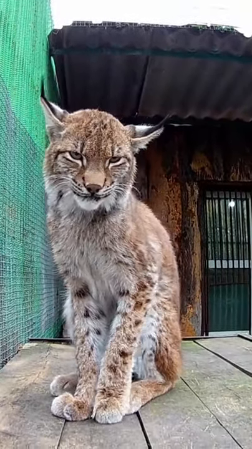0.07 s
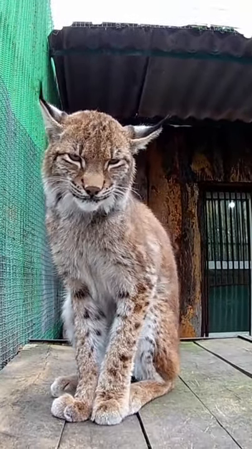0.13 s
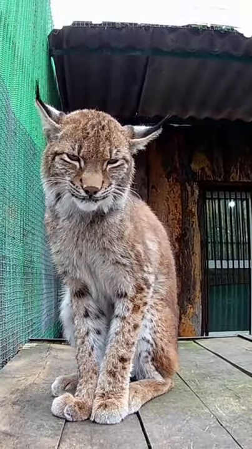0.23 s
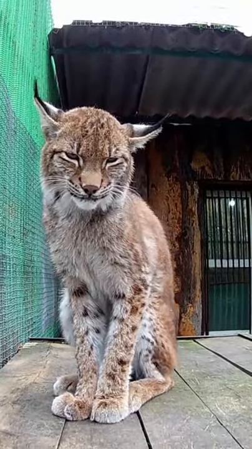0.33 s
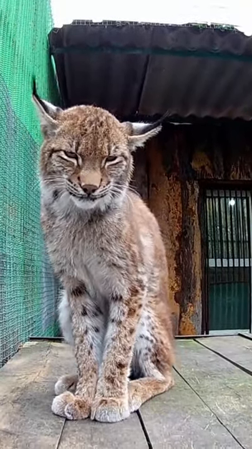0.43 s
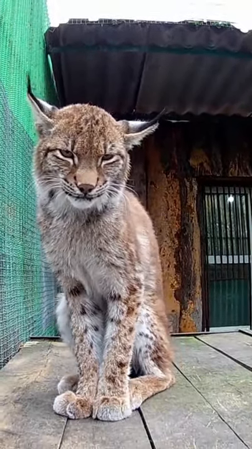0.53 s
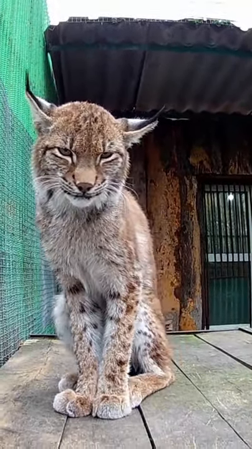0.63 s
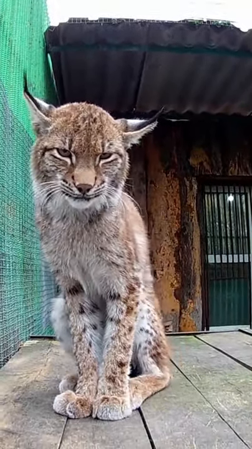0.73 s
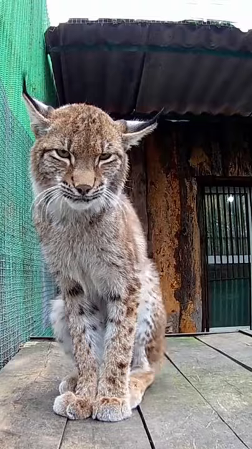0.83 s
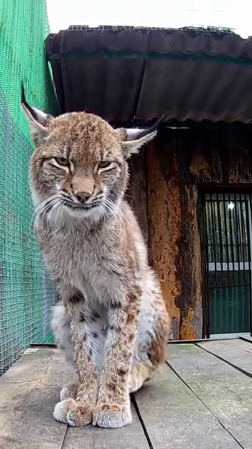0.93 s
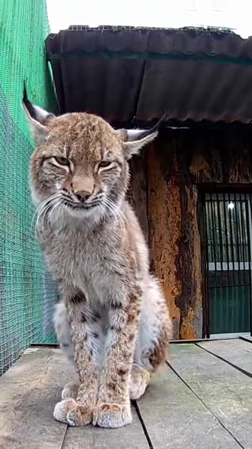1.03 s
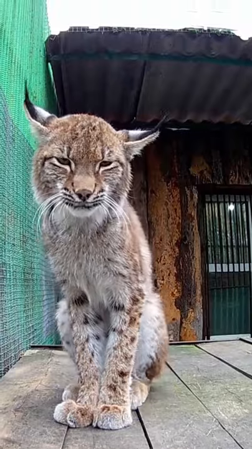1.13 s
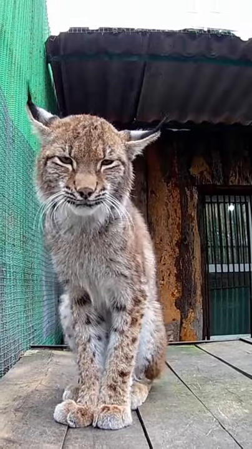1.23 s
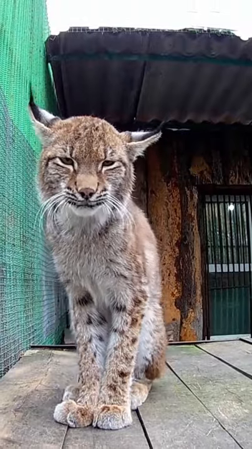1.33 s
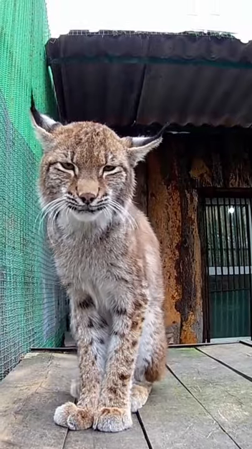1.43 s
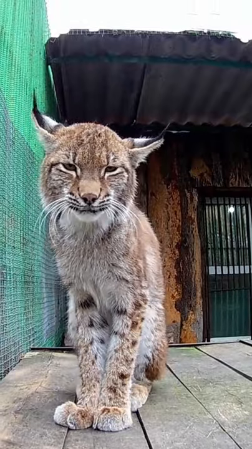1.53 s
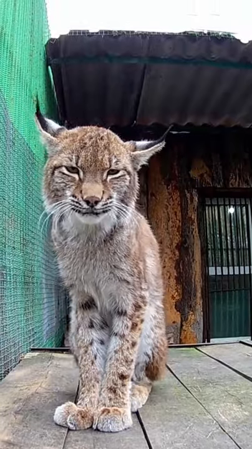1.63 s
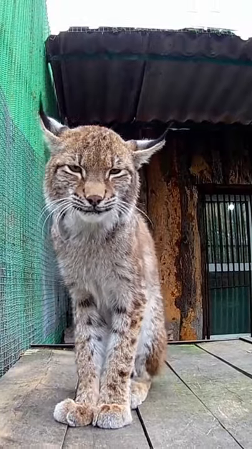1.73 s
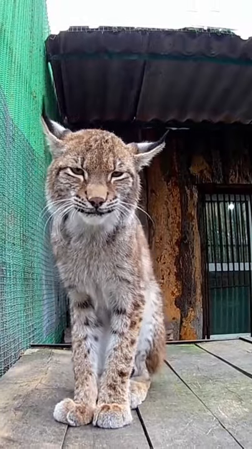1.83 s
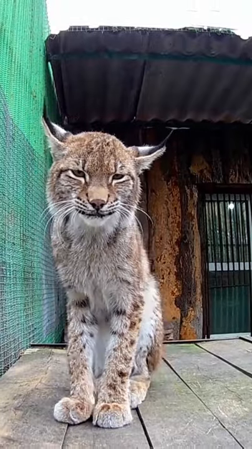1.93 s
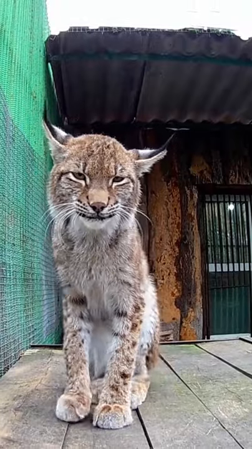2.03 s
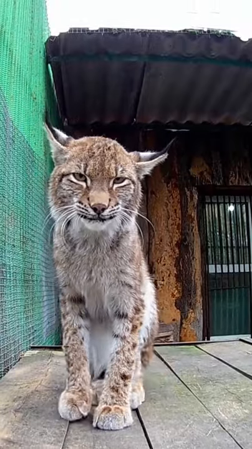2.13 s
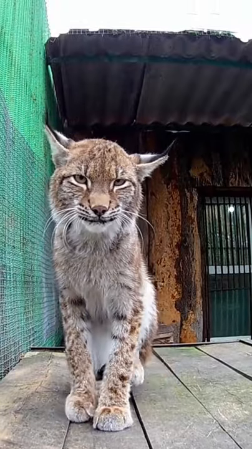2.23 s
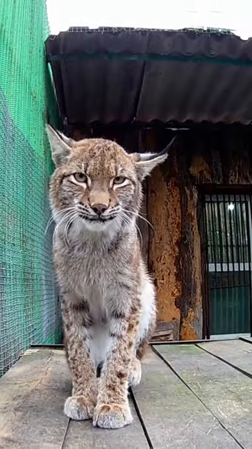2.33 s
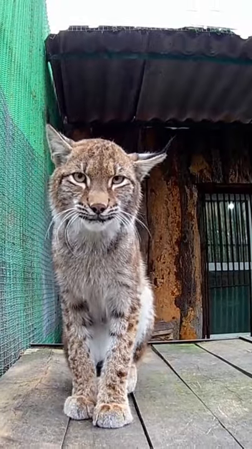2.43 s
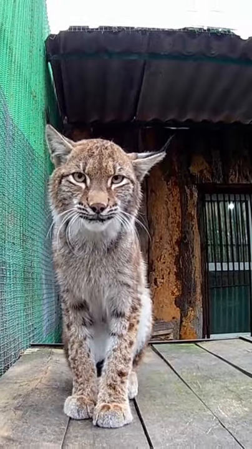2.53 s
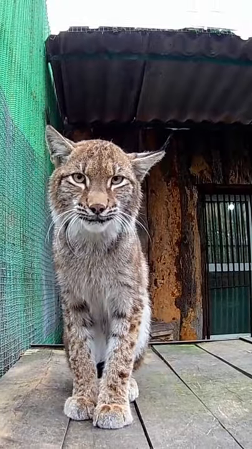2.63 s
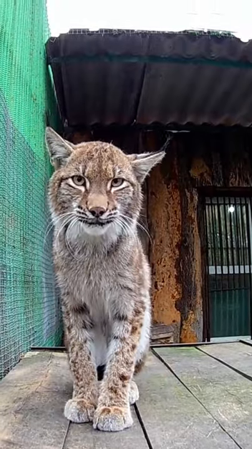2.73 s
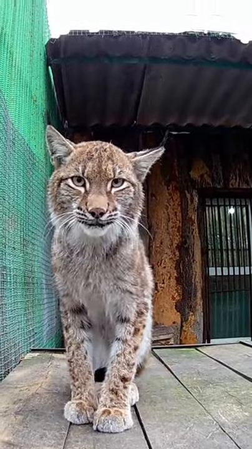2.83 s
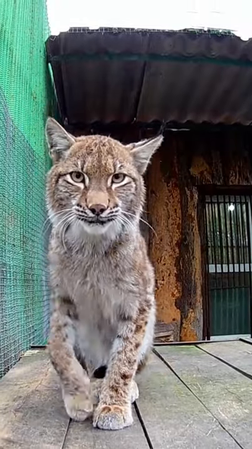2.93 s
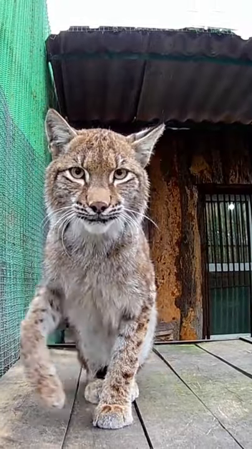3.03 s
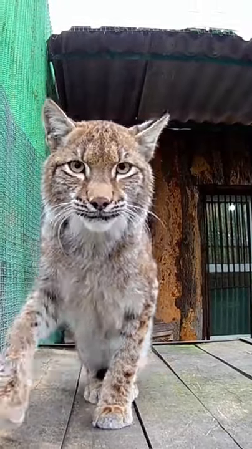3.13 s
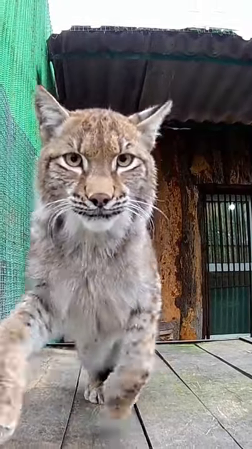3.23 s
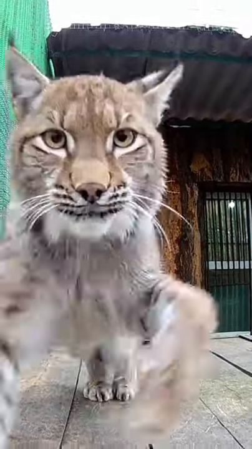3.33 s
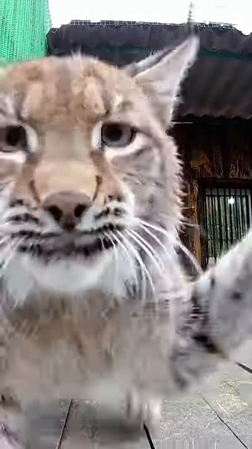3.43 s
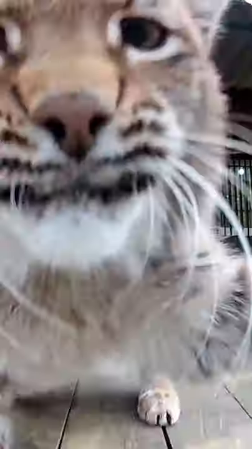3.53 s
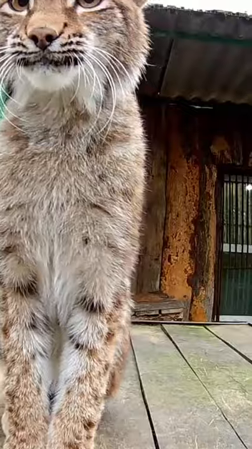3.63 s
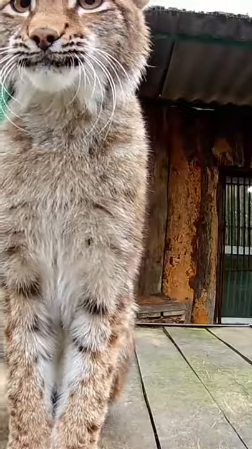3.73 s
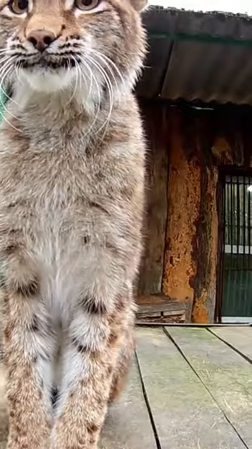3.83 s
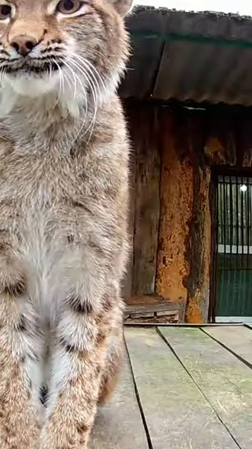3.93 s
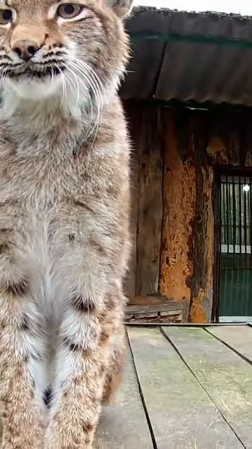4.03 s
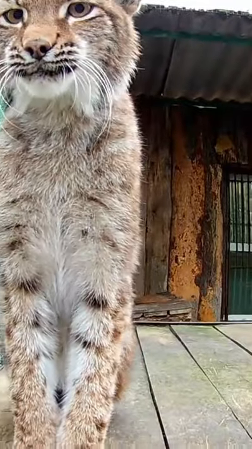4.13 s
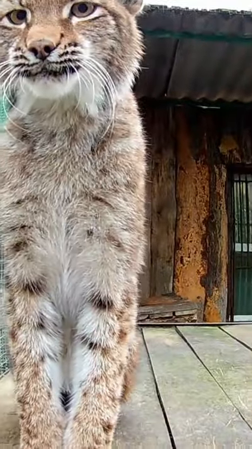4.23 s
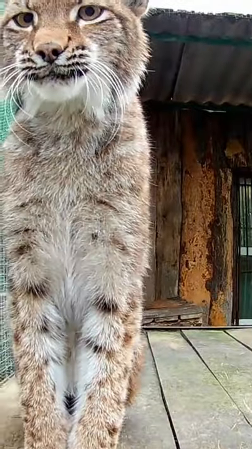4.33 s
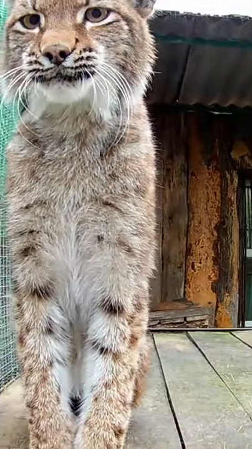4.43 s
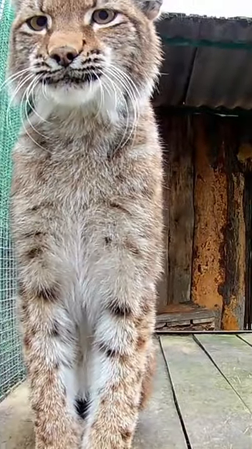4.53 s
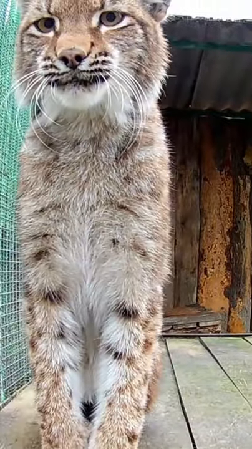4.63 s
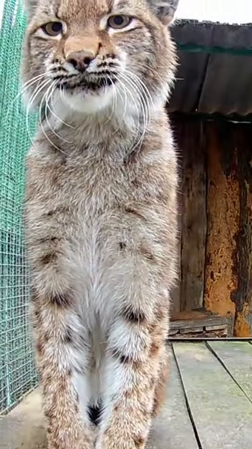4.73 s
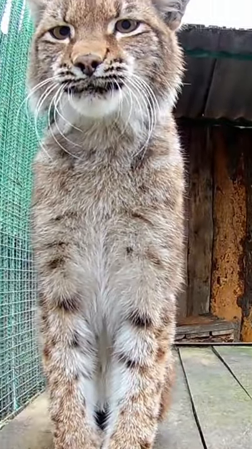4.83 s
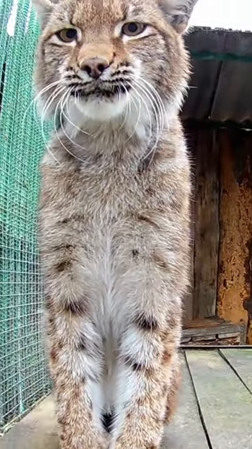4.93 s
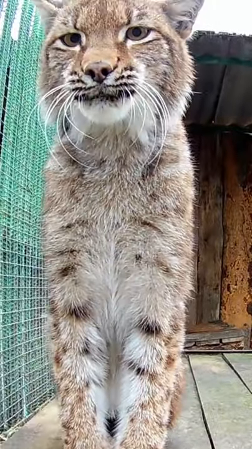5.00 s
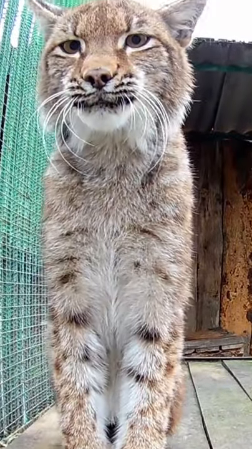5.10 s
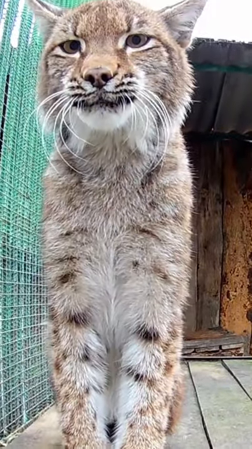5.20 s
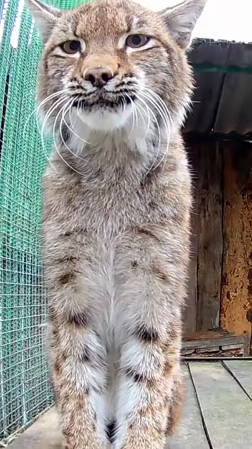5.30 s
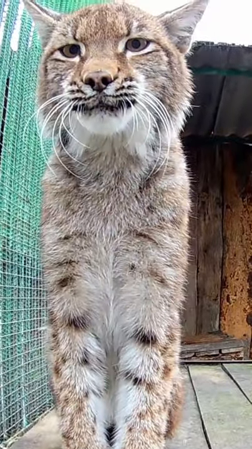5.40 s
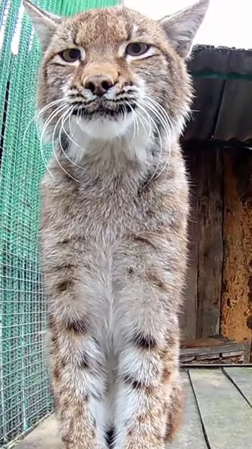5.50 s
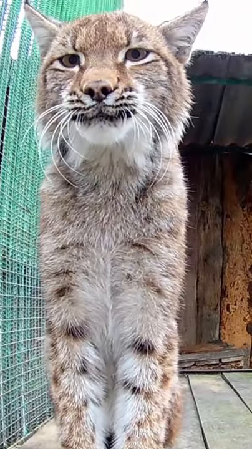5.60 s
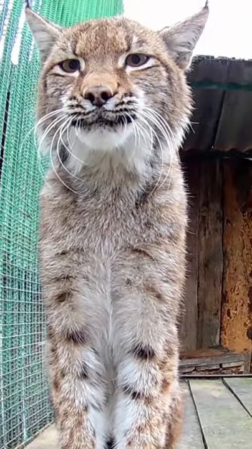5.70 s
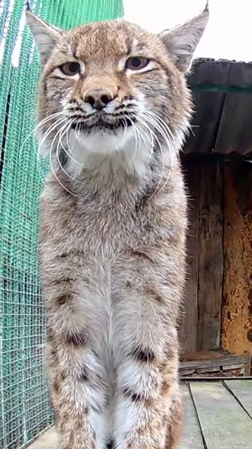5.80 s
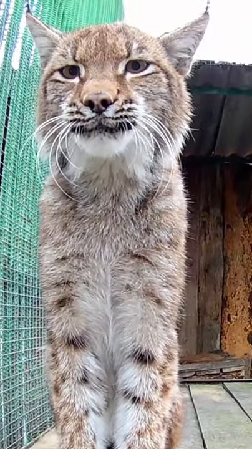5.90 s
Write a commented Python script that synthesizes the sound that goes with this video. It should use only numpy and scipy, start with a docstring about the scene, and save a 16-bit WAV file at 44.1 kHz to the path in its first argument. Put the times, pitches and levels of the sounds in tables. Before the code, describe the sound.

A close handheld-style microphone catches faint hiss and wind rumble, with isolated small claw clicks on planks. A lynx lunges: soft scuffs, then one very loud, slightly flattened knock right on the device. Several duller, turned-down knocks and scrapes follow around four seconds with a faint hum, then far birds call clearly and a few dry taps end it. Almost no echo.

```python
"""Light wind and microphone hiss are heard first, then a lynx's claws tap and scuff a wooden deck in an open pen.
Taps and knocks are short forces exciting resonances; scuffs are showers of slips; wind and hiss are shaped noise.
Far birds whistle in sliding harmonic tones, and a distant flock murmurs as noise in a few bands.
The lynx pounces up to the camera and knocks it; a faint hum near 620 Hz comes and goes.
During the later knocks, from about 4 s to 4.4 s, the whole level is turned down."""
import sys
import numpy as np
from scipy import signal
from scipy.io import wavfile
from scipy.ndimage import uniform_filter1d

SR = 44100
rng = np.random.default_rng(int(sys.argv[2]) if len(sys.argv) > 2 else 0)


def master_out(mix):
    """Clip the mix to full scale and print it as 16-bit PCM to the path in sys.argv[1]."""
    frames = np.transpose(np.atleast_2d(mix))
    ceiling = np.clip(frames, -1, 1)
    pcm = np.round(ceiling * 32767).astype(np.int16)
    wavfile.write(sys.argv[1], SR, pcm)


N = 262836


def gain_of(db):
    """Logarithmic level: 20 dB is a factor of ten in amplitude."""
    return 10 ** (np.asarray(db) / 20)


def evened(x):
    """Power normalisation: scales to rms 1."""
    return x / np.sqrt(np.mean(x ** 2) + 1e-20)


def peaked(x):
    """Amplitude normalisation: scales to peak 1."""
    return x / (abs(x).max() + 1e-20)


def add(mix, start_s, sound):
    """Superposition: sums a sound into the mix in place, from start_s on."""
    part = mix[round(start_s * SR):][:len(sound)]
    part += sound[:len(part)]


def band(x, lo_hz, hi_hz):
    """Causal band-pass filtering with steep skirts."""
    return signal.sosfilt(signal.butter(4, [lo_hz, hi_hz], "band", fs=SR, output="sos"), x)


def resonate(x, hz, width_hz):
    """Resonance by heterodyning: shift the moving pitch hz to zero, smooth, and shift back."""
    turn = np.exp(2j * np.pi * np.cumsum(hz * np.ones(len(x))) / SR)
    r = np.exp(-np.pi * width_hz / SR)
    smoothed = signal.lfilter([1 - r], [1, -r], x / turn)
    return 2 * (turn * smoothed).real


def ring(modes):
    """Modal superposition: an impulse response is a sum of exponentially decaying sines."""
    t = np.arange(SR // 5) / SR
    return sum(gain_of(db - 60 * t / t60) * np.sin(2 * np.pi * hz * t) for hz, db, t60 in modes)


def coloured(spectrum, patchy_db, top_hz):
    """Spectral shaping of random noise, its level drifting in patches of time and frequency; rms 1."""
    hz = np.fft.rfftfreq(1024, 1 / SR)
    f, db = np.transpose(spectrum)
    a, b, patches = rng.standard_normal((N // 256 + 5, 513, 3)).T
    patches = evened(uniform_filter1d(uniform_filter1d(patches, 10, 0), 12, 1))
    shape = gain_of(np.interp(np.log(hz + 1), np.log(f), db)) * (hz < top_hz)
    z = (a + 1j * b) * shape[:, None] * gain_of(patchy_db * patches)
    return evened(signal.istft(z, nperseg=1024, noverlap=768)[1][:N])


def echoes(x, t60, first_s, lo_hz, hi_hz):
    """Reverberation as sparse reflections of random sign under an exponential decay."""
    at = np.arange(round(first_s * SR), round(t60 * SR), 22)
    reflections = np.zeros(at[-1] + 22)
    signs = rng.choice([-1., 1.], len(at))
    reflections[at + rng.integers(0, 22, len(at))] = signs * gain_of(-60 * at / SR / t60)
    reflections = band(reflections, lo_hz, hi_hz)
    return signal.fftconvolve(x, reflections / np.linalg.norm(reflections))[:N]


# spectrum of the microphone hiss, relative: pitch_hz, level_db per Hz
HISS_SPECTRUM = [(100, -14), (190, -4.5), (350, -6), (800, -8), (1700, -22), (3200, -27.5), (6000, -32.5),
                 (10000, -35.5), (12500, -34), (15000, -32)]
HISS_DB, HISS_PATCHY_DB, HISS_TOP_HZ = -68, 1.1, 15150


def hiss():
    """Stationary broadband noise with a sharp upper limit and slight patchiness."""
    return gain_of(HISS_DB) * coloured(HISS_SPECTRUM, HISS_PATCHY_DB, HISS_TOP_HZ)


# spectrum of the wind, relative: pitch_hz, level_db per Hz
WIND_SPECTRUM = [(10, -5), (30, 2.5), (45, 1), (65, 1.5), (100, -3), (130, -13), (200, -13.5), (320, -40.5)]
# gusts over the breeze: centre_s, peak_db, half_width_s (to 1/e)
GUSTS = [(.23, -65, 0.081), (.48, -59, 0.046), (.6, -64.5, 0.084), (.73, -64.5, 0.069), (1.1, -63, 0.056),
         (1.27, -65, 0.046), (1.52, -69, 0.025), (2.01, -69, .04), (2.17, -72, 0.015), (2.87, -59, 0.037),
         (3.29, -55.5, 0.046), (3.42, -54, 0.084), (3.6, -54.5, 0.041), (4.68, -61, .05),
         (5.04, -60, 0.049), (5.3, -63, 0.11), (5.62, -64.5, 0.15), (5.95, -65, 0.032)]
# spectrum of the steady low wind rumble, relative: pitch_hz, level_db per Hz
RUMBLE_SPECTRUM = [(12, -2.5), (30, 0.5), (50, -4.5), (90, -30.5)]
BREEZE_DB, RUMBLE_DB = -67.5, -70.5


def wind():
    """Low-frequency noise on the microphone, modulated by bell-shaped gusts, over a steady low rumble."""
    t = np.arange(N) / SR
    level = gain_of(BREEZE_DB) + sum(gain_of(db) * np.exp(-((t - s) / half) ** 2) for s, db, half in GUSTS)
    rumble = gain_of(RUMBLE_DB) * coloured(RUMBLE_SPECTRUM, .6, 400)
    return level * coloured(WIND_SPECTRUM, 1.5, 400) + rumble


# bands of the blurred calls, the lowest first: pitch_hz, width_hz, level_db (relative)
FLOCK_BANDS = [(1283, 240, 1), (1830, 470, -7), (2200, 160, -15.5)]
# bouts of calls: start_s, length_s, level_db, upper_db (added to the upper bands)
BOUTS = [(0.61, 0.23, -76.5, -1), (0.889, 0.11, -72, 8), (2.56, 0.48, -81, 6.5), (3.242, 0.55, -77, -2.5),
         (4.443, 0.474, -76.5, 8.5), (5.067, 0.29, -70, 3), (5.48, 0.29, -72.5, -1.5)]
FLOCK_DB, FLOCK_UPPER_DB, BOUT_EDGE_S = -83, -5.5, .08  # murmur between bouts; time to swell and fade


def flock():
    """Many overlapping calls merge into grainy noise, resonant in their bands, that swells in bouts."""
    t = np.arange(N) / SR
    db, upper_db = FLOCK_DB, FLOCK_UPPER_DB
    for s, length, bout_db, bout_upper_db in BOUTS:
        share = np.clip(np.minimum(t - s, s + length - t) / BOUT_EDGE_S + .5, 0, 1)
        db = db + share * (bout_db - FLOCK_DB)
        upper_db = upper_db + share * (bout_upper_db - FLOCK_UPPER_DB)
    grain = evened(uniform_filter1d(rng.standard_normal(N), 500))
    noise = rng.standard_normal(N) * gain_of(2.5 * grain)
    low, *upper = (gain_of(level) * evened(resonate(noise, hz, width)) for hz, width, level in FLOCK_BANDS)
    return gain_of(db) * band(low + gain_of(upper_db) * sum(upper), 900., 2500.0)


# far bird notes: start_s, length_s, start_hz, end_hz, level_db
NOTES = [(0.625, 0.032, 2306, 1730, -72), (0.659, 0.092, 1248, 1314, -72.5),
         (0.778, 0.1, 1850.0, 1770, -79), (0.928, 0.036, 2190, 1770, -74), (0.936, 0.027, 1300, 1340, -75),
         (1.131, 0.026, 2076, 2010, -71.5), (1.152, 0.022, 2570, 2200, -76.5),
         (2.501, 0.058, 1740, 1755, -77), (2.586, 0.074, 1740, 1776, -71), (2.686, 0.048, 1805, 1710, -75),
         (2.727, 0.062, 2830.0, 2730, -78), (2.764, 0.07, 1970, 2060, -73.5),
         (2.958, 0.079, 1790.0, 1800, -71), (3.04, 0.069, 1770, 1690, -75),
         (4.446, 0.051, 1370, 1044, -59.5), (4.498, 0.052, 1347, 997, -63.5),
         (4.519, 0.053, 2207, 1704, -65.5), (4.573, 0.076, 1708, 1574, -68.5), (4.6, .25, 2618, 2387, -79),
         (5.043, 0.031, 1290, 1450, -66.5), (5.06, 0.049, 2172, 1683, -64.5),
         (5.11, 0.19, 2680.0, 2330, -76), (5.031, 0.44, 4410, 4070, -84.5), (5.202, 0.3, 3410, 3400, -86),
         (5.599, 0.19, 2390, 2250, -81), (5.469, 0.045, 2162, 1810.0, -65), (5.51, 0.04, 1750, 1720, -66)]
# a harsher squawk, rich in overtones: start_s, length_s, start_hz, end_hz, level_db
SQUAWKS = [(0.903, 0.04, 1412, 1214, -63.5)]
OVERTONE_DB, SQUAWK_OVERTONE_DB = -31, -6.5  # step from each harmonic to the next
HUSK_DB, HUSK_DB_PER_S = 1.06, 6.5  # long notes are hoarser


def bird_note(length, start_hz, end_hz, db, overtone_db):
    """A gliding harmonic series, made hoarse by random frequency and amplitude modulation."""
    t = np.arange(0, length, 1 / SR)
    waver, husk = (evened(uniform_filter1d(rng.standard_normal(SR // 2), 250))[:len(t)] for _ in "ab")
    glide = np.linspace(start_hz, end_hz, len(t)) * (1 + (0.0093 + 0.04 * length) * waver)
    phase = 2 * np.pi * np.cumsum(glide) / SR
    note = sum(gain_of(overtone_db * k) * np.sin((k + 1) * phase) for k in range(4))
    level = gain_of(db + (HUSK_DB + HUSK_DB_PER_S * length) * husk)
    return level * note * signal.windows.tukey(len(t), .4)


def birds():
    """Direct sound plus reverberation: far calls and the echoes of the open ground."""
    calls = np.zeros(N)
    for table, overtone_db in ((NOTES, OVERTONE_DB), (SQUAWKS, SQUAWK_OVERTONE_DB)):
        for s, *row in table:
            add(calls, s, bird_note(*row, overtone_db))
    return calls + gain_of(-10) * echoes(calls, t60=0.95, first_s=.018, lo_hz=500., hi_hz=4500.)


# the faint hum comes and goes: start_s, length_s, level_db, fade_db per s
HUM = [(0.556, 0.13, -59, -89), (4.003, 0.392, -55.5, -16), (4.394, 0.25, -67, -50)]
# tones of the hum, relative: pitch_hz, level_db
HUM_TONES = [(623, 0.5), (1330, -16), (2330, -24)]


def hum():
    """Additive synthesis: a few steady tones, with a slight beat as amplitude modulation."""
    t = np.arange(N) / SR
    level = np.zeros(N)
    for s, length, db, fade_db in HUM:
        level += (t > s) * (t < s + length) * gain_of(db + fade_db * np.clip(t - s, 0, length))
    beat = 1 + 0.23 * np.sin(2 * np.pi * 7.9 * t)
    tones = sum(gain_of(db) * np.sin(2 * np.pi * hz * t) for hz, db in HUM_TONES)
    return uniform_filter1d(level, size=400) * beat * tones


# faint dry ticks: start_s, peak_db, pitch_hz, length_s (to fall 30 dB)
TICKS = [(3.041, -63, 3180, 0.0097), (3.949, -56.5, 2010, 0.004), (4.347, -52.5, 2794, 0.0045),
         (4.361, -40.5, 2710, 0.0083), (4.62, -62.5, 3865, .006), (4.668, -62, 3980, 0.013),
         (4.778, -69, 3000, .006), (4.805, -61, 3700, .006), (4.897, -68, 4400, 0.0054)]


def tick(db, hz, length):
    """Transient noise: an exponentially decaying crackle in a wide high band."""
    crackle = rng.standard_normal(1500) * gain_of(-30 * np.arange(1500) / SR / length)
    return gain_of(db) * peaked(band(crackle, 0.44 * hz, 1.18 * hz))


# scuffs of pad and fur: start_s, rise_s, hold_s, fall_s, level_db, fall_db, start_hz, end_hz (resonance),
# middle_db (1.1-2.4 kHz), rasp_db (2.1-6 kHz), the last two relative to level_db
SCUFFS = [(.526, 0.017, 0.0056, 0.005, -29.5, -16, 656, 650, -18.5, -20.5),
          (0.549, 0.0025, 0.012, .03, -51, -18, 623, 594, -9.5, -18),
          (3.111, 0.011, 0.037, .004, -59, -12, 674, 680, -11, -9),
          (3.388, 0.007, 0.011, 0.086, -36.5, -25, 400, 263.5, -36.5, -40),
          (3.489, 0.015, .012, 0.0032, -50, 2.5, 421.7, 420, -9.5, -14.5),
          (3.533, .002, .025, 0.016, -48.5, -7, 580, 450, -9, -23),
          (3.573, .018, .028, 0.0034, -29.5, -4, 299.5, 249, -37, -36.5),
          (4.003, 0.00094, 0.01, 0.0065, -23.5, -12, 402, 397, -10, -22),
          (4.03, 0.0024, 0.0218, 0.0036, -44.5, -6, 520, 473, -14, -47),
          (4.053, .002, 0.02, .016, -34, -28, 510, 433, -19, -24),
          (4.224, 0.0022, .002, 0.072, -45, -17, 600, 499.5, -4, -22)]
SCUFF_RISE_DB = -22  # level at which a scuff sets in, under its peak
TREBLE_FADE = 0.37  # a fading scuff loses this share more dB in its upper ranges


def scuff(rise, hold, fall, level_db, fall_db, start_hz, end_hz, middle_db, rasp_db):
    """Friction excitation: a dense shower of uneven slips drives the deck, its middle range and a dry rasp."""
    corners = np.cumsum([0, rise, hold, fall])
    t = np.arange(0, corners[-1] + 0.04, 1 / SR)  # leaves time to ring out
    db = level_db + np.interp(t, corners, [SCUFF_RISE_DB, 0, 0, fall_db])
    hz = np.interp(t, [0, corners[-1]], [start_hz, end_hz])
    dulled_db = TREBLE_FADE * np.interp(t, corners[2:], [0, fall_db])
    slips = rng.standard_normal(SR // 5) * gain_of(2.0 * rng.exponential(1, SR // 5))
    slips = slips[:len(t)]
    stroke = gain_of(db) * uniform_filter1d(1. * (t < corners[-1]), size=40)

    def deck(x):
        """Two cascaded resonances follow the gliding pitch."""
        resonant = resonate(resonate(x, hz, 170.), hz, 330.)
        return band(resonant + 0.061 * band(x, 120.0, 1200.0), 89.6, 1500.0)

    def middle(x):
        """Band-limited friction noise."""
        return band(x, 1100.0, 2400.)

    def rasp(x):
        """High friction noise around a broad resonance."""
        return band(resonate(x, 3150., 500.) + .15 * x, 2100.0, 6000.0)

    parts = ((0, deck), (middle_db + dulled_db, middle), (rasp_db + dulled_db, rasp))
    # each part is scaled by its response to the steady slips
    return sum(part(slips * stroke * gain_of(level)) / np.std(part(slips)) for level, part in parts)


# claw taps: start_s, peak_db, pitch_hz, bite_db (1.7-5.2 kHz), thud_db (88-486 Hz), both before the final
# peak scaling, decay_s (sets the narrowest resonance), sharp (pitch factor at first contact)
TAPS = [(0.518, -29, 760, -29, -24, 0.0086, 3.07), (0.612, -42.5, 660, -32, -14, 0.006, 3.36),
        (0.907, -50.5, 900, -30, -25, 0.0094, 1.2), (1.208, -52.5, 1140, -27, -6, 0.015, 1.1),
        (1.225, -45.5, 1240, -27, -19, 0.0094, 1.4), (1.235, -26, 1590, -40, -42, 0.015, 1.44),
        (1.24, -33, 803, -31, -27, 0.0083, 2.27), (1.983, -30, 1100, -50, -31, 0.0046, 2.08),
        (2.221, -43.5, 1020, -15, -31, 0.0061, 1.57), (2.366, -26.5, 1044, -43, -16.5, 0.0098, 1.35),
        (2.385, -39, 725, -13.5, -11, 0.0018, 4.3), (2.425, -38.5, 720, -48, -6, 0.0065, 1.05),
        (2.669, -43, 1160, -20, -24, 0.023, 1.09), (4.415, -50, 622, -17, -18, 0.0049, 2),
        (5.016, -54, 1070, -30.5, -12, 0.015, 1.1), (5.297, -32.5, 950, -44, -35, 0.0062, 2.2),
        (5.575, -39.5, 1050, -29, -31, 0.006, 1.65), (5.861, -45, 1040, -36, -32, 0.012, 1.5)]
# modes of the plank, relative: pitch_hz, level_db, t60_s
PLANK = [(457, 2.5, 0.078), (682, -2.5, 0.19), (855, -2, 0.07), (1110, -1, 0.078), (1260, 4.5, 0.026),
         (1570, -0.5, 0.063), (2090, 4, 0.077), (2546, 9, 0.038)]
CHATTER_S, FIRST_CONTACT, PLANK_DB = .0029, 0.39, -15.5  # nominal spread; first amplitude; plank to click


def tap(db, hz, bite_db, thud_db, decay_s, sharp):
    """Repeated impact: four quick claw contacts, duller as the pad lands, excite the plank's modes."""
    t = np.arange(SR // 5) / SR
    contacts = np.zeros(len(t))
    at = np.sort(rng.uniform(.9, 1.1, 4) * [0, .3, .55, 1]) * CHATTER_S * SR
    np.add.at(contacts, at.astype(int), [FIRST_CONTACT, -1., .6, -.3])
    pitch = hz * (1 + (sharp - 1) * np.exp(-t / 0.001))
    click = contacts
    for width_hz in (2.64 / decay_s, 1.66 * hz, 2.5 * hz):
        click = resonate(click, pitch, width_hz)
    click = peaked(click)
    bite = peaked(band(rng.standard_normal(len(t)) * np.exp(-(t / CHATTER_S) ** 2), 1700.0, 5200.0))
    thud = peaked(band(contacts, 88.0, 486.0))
    plank = peaked(signal.fftconvolve(click, ring(PLANK))[:len(t)])
    mixed = click + gain_of(bite_db) * bite + gain_of(thud_db) * thud + gain_of(PLANK_DB) * plank
    return gain_of(db) * peaked(mixed)


# the knocks jolt the microphone: start_s, peak_db, length_s
JOLTS = [(3.5315, -29, 0.012), (4.198, -18, 0.0046), (4.2245, -22, 0.007), (4.3205, -41, 0.0095)]


def jolt(db, length):
    """High-pass response to a slow pulse: one low push that swings back."""
    push = np.pad(signal.windows.hann(round(length * SR)), (0, SR // 10))
    return -gain_of(db) * peaked(signal.lfilter(*signal.butter(1, 60., "high", fs=SR), push))


# claws and paw hit the camera: start_s, level_db, contact_s, spot_hz (pitch favoured by the spot struck),
# crack_db (relative), free (factor on ring time: low while the paw rests on it)
BLOWS = [(3.5232, -24.5, 0.00035, 1050, -19, .6), (3.5318, 2, 0.0015, 690, -25.5, 1.49),
         (3.5338, -2.5, 0.00059, 750, -36, 1.41), (4.004, 2.5, 0.001, 462.7, -24, 0.7),
         (4.006, 0, 0.00055, 870, -37, 0.55), (4.0525, -15.5, .0005, 866, -23, 0.98),
         (4.198, -6.5, 0.00044, 1080, -40, 0.31), (4.2005, -16.5, 0.0003, 1400, -23, .3),
         (4.2235, 2.5, 0.00026, 1660, -8.5, 0.32), (4.225, 2.5, 0.00032, 685, -29, 0.44),
         (4.3205, -17.5, 0.00045, 800, -6.5, 0.48), (4.327, -27, .0005, 697, -16, 1.6)]
# modes of the camera and its stand, relative: pitch_hz, level_db, t60_s (when free is 1)
CAMERA_MODES = [(210.4, -24.5, 0.072), (318.5, -29, .03), (463, -11.5, 0.039), (671.3, -16, 0.012),
                (786, -1, 0.013), (870, -10.5, .03), (1000, -16, 0.11), (1275, 2, 0.013),
                (1540, -26.5, .09), (1740, -20, .04), (2130, -28.5, 0.036), (2695, -21, 0.1),
                (3900, -35, 0.023), (4330, -25.5, .015)]


def blow(db, contact_s, spot_hz, crack_db, free):
    """Modal excitation: a smooth push and a sharp tick ring the modes favoured by the spot; a crack on top."""
    struck = []
    for hz, level_db, t60 in CAMERA_MODES:
        favour_db = 12 * np.exp(-(np.log(hz / spot_hz) / 0.26) ** 2)
        struck.append((hz, level_db + favour_db, free * t60))
    modes = ring(struck)
    push = signal.windows.hann(round(contact_s * SR))
    body = peaked(np.convolve(push, modes)[:len(modes)])
    upper = gain_of(-7.5) * band(peaked(modes), 1900., 5500.0)  # the sharp tick
    crack = rng.standard_normal(len(modes)) * gain_of(-60 * np.arange(len(modes)) / SR / 0.012)
    crack = resonate(resonate(crack, 3100.0, 1500.), 2700.0, 6000.) + 0.056 * resonate(crack, 6000., 6000.)
    return gain_of(db) * (band(body, 165., 6000.) + upper + gain_of(crack_db) * crack)


def scene():
    """Linear superposition of the background, the paws, the knocks and short echoes of the pen."""
    background = hiss() + wind() + flock() + birds() + hum()
    paws = np.zeros(N)
    for table, source in ((TICKS, tick), (TAPS, tap), (JOLTS, jolt), (BLOWS, blow)):
        for s, *row in table:
            add(paws, s, source(*row))
    pen = gain_of(-28.0) * echoes(paws, t60=0.043, first_s=0.0038, lo_hz=300., hi_hz=4000.)
    for s, *row in SCUFFS:  # added after the echoes, so scuffs stay dry
        add(paws, s, scuff(*row))
    return (background + paws + pen)[None]


CEILING, EDGE_HZ = .71, 16430  # amplitude limit before the dip and filter; upper band limit
DIP_FROM_S, DIP_TO_S, DIP_DB = 3.96, 4.391, -18.2


def record(dry):
    """Saturation flattens the hardest knocks; then come a brief level dip and low-pass filtering."""
    t = np.arange(N) / SR
    dip = uniform_filter1d(1. * (t > DIP_FROM_S) * (t < DIP_TO_S), size=60)
    clipped = CEILING * np.tanh(abs(dry / CEILING) ** 4) ** (1 / 4) * np.sign(dry)
    low_pass = signal.firwin(511, EDGE_HZ, window=("kaiser", 9), fs=SR)[None]
    return signal.oaconvolve(clipped * gain_of(DIP_DB * dip), low_pass, "same")


dry = scene()
out = record(dry)
master_out(out)
```